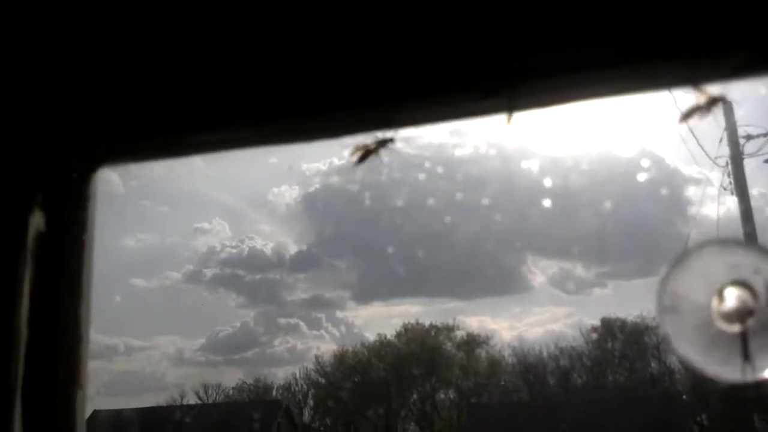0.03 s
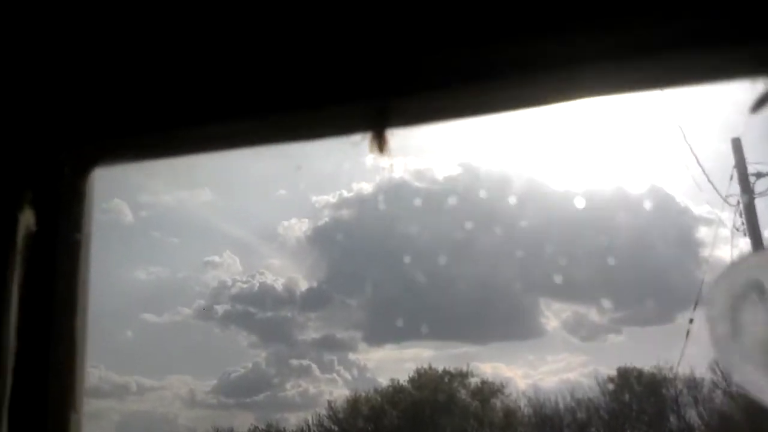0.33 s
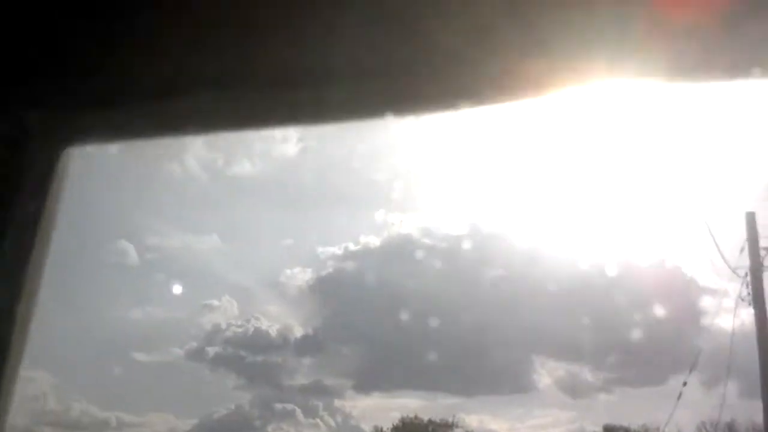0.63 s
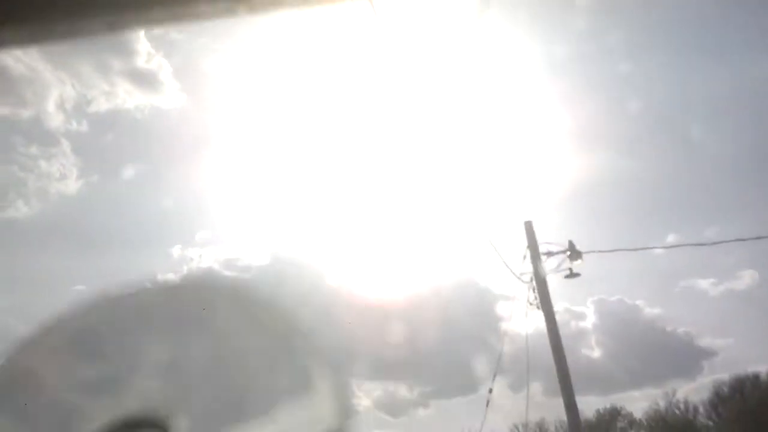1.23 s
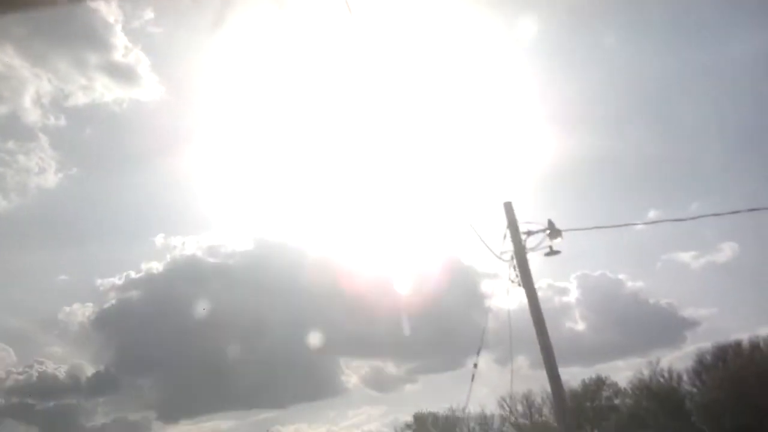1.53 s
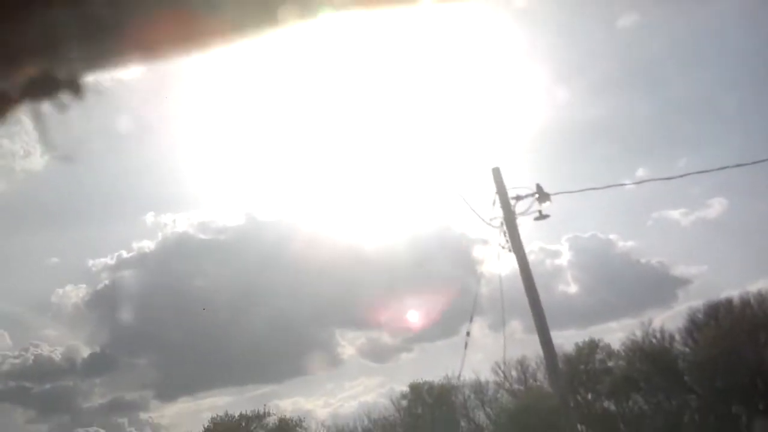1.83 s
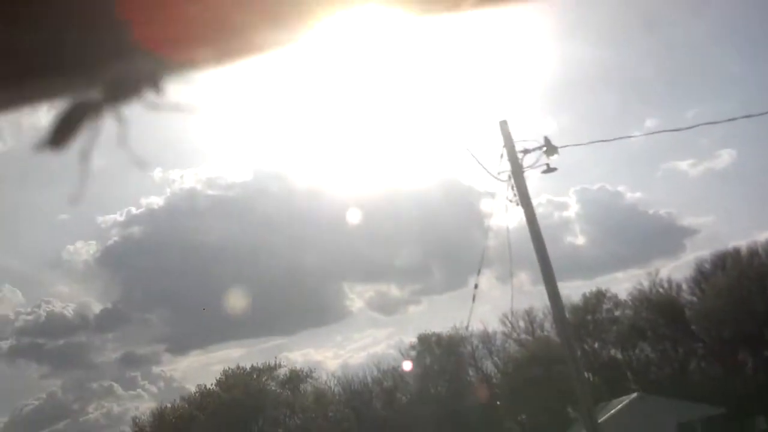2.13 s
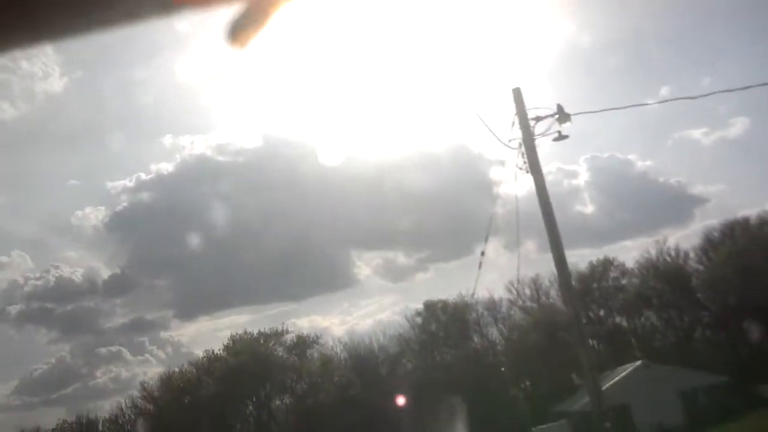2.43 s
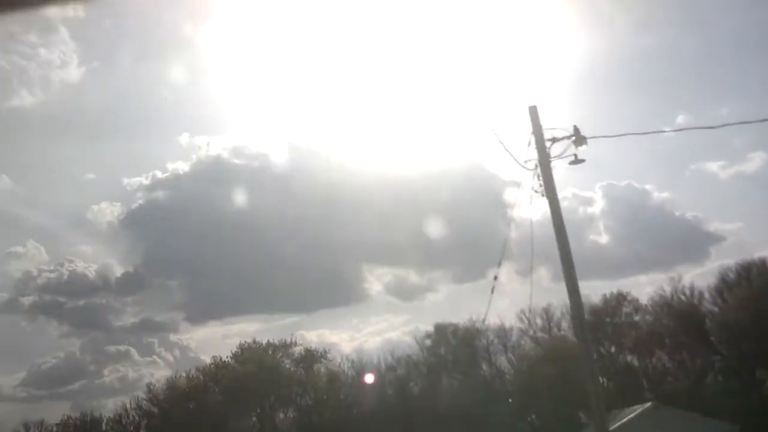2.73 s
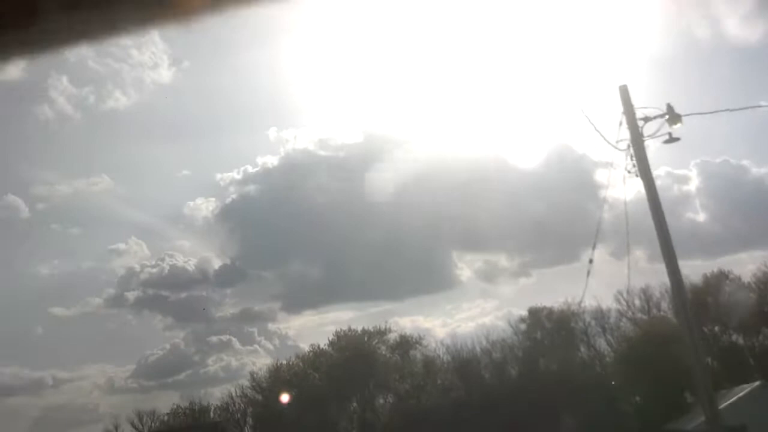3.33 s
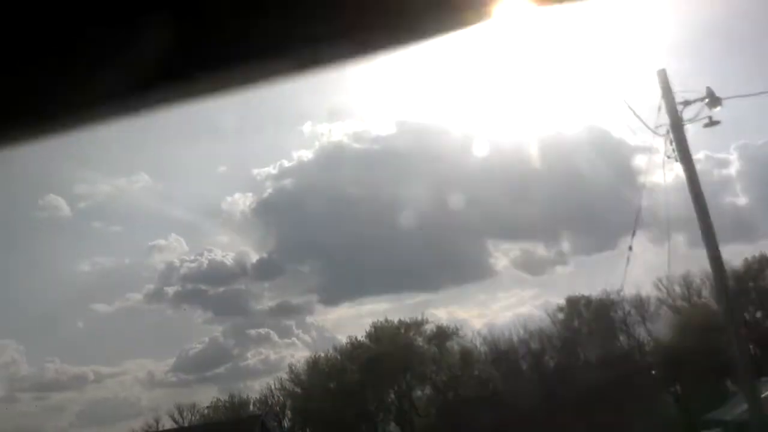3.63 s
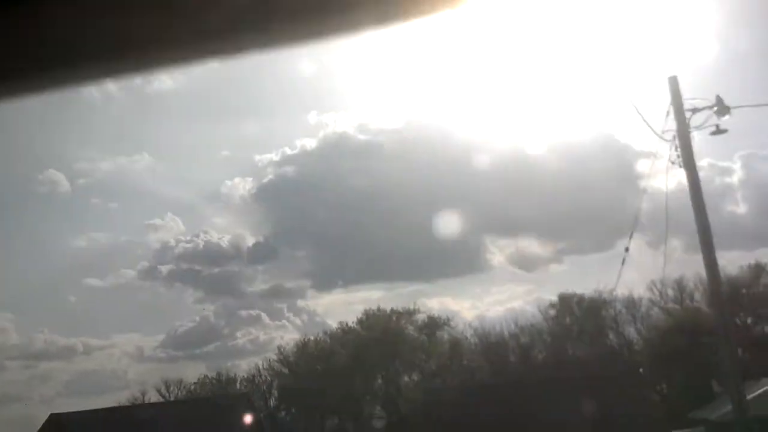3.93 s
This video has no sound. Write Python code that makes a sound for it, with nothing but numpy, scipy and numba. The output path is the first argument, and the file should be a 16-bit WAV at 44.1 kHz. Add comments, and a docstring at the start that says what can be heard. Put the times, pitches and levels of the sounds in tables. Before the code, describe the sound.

A low engine or fan hum runs throughout inside a cabin. A faint dull rush lies over it until a sharp tap strikes the microphone's case at 0.4 seconds, then a drone swells and stays. Lighter taps land at 1.4 and 2.7 seconds. The grip brushes the case now and then, hardest from 2.3 seconds with a brief soft rumble, and light rubs follow until about 3.5 seconds.

```python
"""A low engine or fan hum fills a cabin, heard from a hand-held camera beside the window.
A dull rush lies over it until a sharp tap rings the camera's case at 0.4 s; then a drone swells.
A second tap lands at 1.4 s. The grip brushes the case now and then, hardest from 2.3 s, where the
case also rumbles. A third tap comes at 2.7 s, and a few light rubs follow. Throughout, the recorder
widens the stereo; its gain control turns the sound down at each tap and lets the hum swell back."""
import sys
import numpy as np
from scipy import signal
from scipy.fft import rfft, irfft
from scipy.io import wavfile
from scipy.ndimage import uniform_filter1d
from numba import njit

SR = 44100
rng = np.random.default_rng(int(sys.argv[2]) if len(sys.argv) > 2 else 0)


def store_pcm(level_fs):
    """Save levels as 16-bit WAV."""
    pcm = np.round(np.clip(level_fs, -1, 1) * 32767).astype(np.int16)
    wavfile.write(sys.argv[1], SR, np.atleast_2d(pcm).T)


N = 176400

# How much the hum differs between the two microphones, against their sum (frequency [Hz], level [dB])
HUM_SPREAD = [(30, -2), (70, -51), (140, -2.5), (350, -8.5), (700, -6.5), (1300, 2), (2500, -1), (5000, 1),
              (15000, 0)]


def machine(t):
    """The running machine rumbles, whines and makes the cabin ring, with a drone that swells."""
    # Tone colour of the broad rumble (frequency [Hz], relative level [dB])
    rumble_colour = [(25, -46), (50, -25), (75, -11.5), (110, 4.5), (145, 5.5), (170, -1), (260, 1),
                     (340, 3), (430, -6), (520, -5), (720, -9.5), (1000, -17), (1300, -22.5), (2200, -23),
                     (3200, -22.5), (4200, -31.5), (6500, -39.5), (10000, -44.5), (16000, -38)]
    # Bands that ring all the time (frequency [Hz], width [Hz], level [dB])
    steady_bands = [(80, 6.2, -59.5), (122, 9.2, -53), (662, 53, -57.5), (761, 18, -65), (879, 29, -68.5),
                    (1290, 32, -71), (3160, 320, -83.5), (6740, 490, -70.5), (8850, 450, -70.5)]
    # Bands that drone in the cabin (frequency [Hz], width [Hz], level [dB])
    drone_bands = [(321, 55, -46), (369, 12.8, -44), (387, 75, -44), (477.7, 32, -47.5), (572, 53, -53)]
    # The machine's low tones (frequency [Hz], level [dB])
    low_tones = [(188.6, -47), (237.5, -50), (371, -51)]
    # Its thin, high whines (frequency [Hz], level [dB])
    whines = [(3263, -69.5), (8789, -76)]
    # How the sound rises and falls (time [s], hum gain [dB], drone gain [dB])
    loudness = [(0, -1, -14), (.37, -2, -22), (.45, -.5, -23), (.6, 0, -9.5), (1.3, 0.4, 0), (1.9, 0.04, 2),
                (2.3, 0.9, 2.5), (2.6, -0.5, -1), (3.0, -1.45, 0), (3.5, 0.9, 0.3), (4, 0.5, 1)]
    times, hum_db, drone_db = np.array(loudness).T
    flutter_db = 1.17 * wander(27.07)
    hum = undb(-40 + flutter_db) * noise(undb(curve(rumble_colour)), curve(HUM_SPREAD))
    hum += ringing(steady_bands)
    hum += tones(low_tones, drift=0.0044, waver_db=1)
    hum += tones(whines, drift=0.00303, waver_db=2)
    hum *= undb(np.interp(t, times, hum_db))
    drone = ringing(drone_bands) * undb(np.interp(t, times, drone_db))
    swell_db = 0.19 * wander(2.635)
    return (hum + drone) * undb(swell_db)


def ringing(bands):
    """The machine and cabin ring at certain pitches: one narrow band of noise for each."""
    spread_db = curve(HUM_SPREAD)
    return sum(undb(db) * noise(resonance(hz, width), spread_db) for hz, width, db in bands)


def tones(table, drift, waver_db):
    """Pure tones that waver in level and in pitch (drift is a fraction of the pitch)."""
    out = 0
    for hz, db in table:
        pitch = hz * (1 + drift * wander(13))
        phase = 2 * np.pi * np.cumsum(pitch) / SR
        out += np.sqrt(2) * undb(db + waver_db * wander(8.2)) * np.sin(phase)
    return out


def taps():
    """Each tap snaps, touches twice and rings the case briefly, nearer the right microphone."""
    # One faint touch, then three sharp taps
    # (time [s], level [dB], treble tilt [dB per octave], bounce delay [s], bounce strength [ratio])
    hits = [(0.3403, -30, 3, .002, 0.41), (0.3769, 2.5, -1.4, 0.00027, 0.42),
            (1.4024, -7, -1.5, 0.000868, 0.27), (2.6722, -6, -0.3, .00075, 0.35)]
    # The notes the case rings at
    # (frequency [Hz], level [dB], time to fade 60 dB [s], left swing against right [ratio])
    case_notes = [(844, -26, 0.0043, 0.93), (1390, -17.5, 0.016, 0.13), (1870, -12.5, 0.015, 0.23),
                  (3360, -8, 0.0058, 0.11), (4050, -9, 0.006, 0.38), (5590, -2.5, 0.0029, 0.077),
                  (6900, -8, 0.005, 0.68), (8690, -3, 0.0039, -0.2), (12600, -13.5, 0.0025, 0.95),
                  (13940, -11, 0.0039, -0.012)]
    snap_db, snap_fade_s, tilt_pivot_hz = -26, 0.0097, 3900
    out = np.zeros((2, N))
    age = np.arange(SR // 20) / SR
    snap = noise(resonance(hz=11100, width=6200), spread_db=0)
    for start, db, tilt_db, bounce_s, bounce_strength in hits:
        first = int(start * SR)
        span = slice(first, first + len(age))
        out[:, span] += snap[:, span] * undb(db + snap_db - 60 * age / snap_fade_s)
        for delay, strength in ((0, 1), (bounce_s, bounce_strength)):
            since = np.maximum(age - delay, 0)
            for k, (hz, note_db, fade_s, left) in enumerate(case_notes):
                ring = (-1) ** k * np.sin(2 * np.pi * hz * since) * undb(-60 * since / fade_s)
                gain = strength * undb(db + note_db + tilt_db * np.log2(hz / tilt_pivot_hz))
                out[:, span] += gain * np.outer([left, 1], ring)
    return out


def rubs(t):
    """The grip drags on the case: each grainy rub catches, hisses in its own band and lets go."""
    # Each rub (start [s], length [s], rise time [s], level [dB], treble tilt [dB per octave],
    # drop over its length [dB], hiss frequency [Hz], hiss boost [dB])
    strokes = [(-.02, 0.35, .008, -58, 6, -5, 5000, -12), (0.337, 0.074, .005, -49, 6.5, -0.5, 6500, -1),
               (0.581, 0.094, 0.041, -49, 7, 4.5, 6400, 5), (1.123, .012, .006, -57, 6, 3, 6900, 9),
               (1.645, 0.11, 0.01, -48, 6.5, 12, 6546, 0), (1.984, 0.27, 0.037, -59, 9, -1, 5100, 10),
               (2.266, 0.036, 0.019, -45.5, 5, -6.5, 5800, 0.5),
               (2.308, 0.038, 0.016, -40.5, 3.5, -1, 7500, 3),
               (2.344, 0.089, 0.012, -44.5, 7, 1.5, 6740, 0), (2.404, 0.3, 0.011, -50.5, 5.5, 3.5, 6500, 0),
               (2.516, 0.056, 0.0022, -36.5, 2.5, 22, 3920, 8), (2.68, 0.18, 0.11, -49, 7.5, 4.5, 6400, 3),
               (3.099, 0.055, 0.012, -47, 3.5, 20, 6200, 6), (3.17, 0.29, 0.11, -58, 7.5, 5.5, 6330, 12)]
    # Tone colour of all rubbing (frequency [Hz], relative level [dB])
    rub_colour = [(25, -20), (60, -4), (130, -3), (400, -18), (700, 9), (1300, 16), (1700, 9), (2200, 14),
                  (3400, 5.5), (5000, -0.5), (6700, -0.5), (9500, -11), (12000, -17), (16000, -19.5)]
    release_s = 0.014
    out = 0
    for start, length, rise, db, tilt_db, drop_db, hiss_hz, boost_db in strokes:
        age = t - start
        shape = np.clip(age / rise, 0, 1) * np.exp(-np.maximum(age - length, 0) / release_s)
        gain = undb(db - drop_db * np.clip(age / length, 0, 1))
        hiss_db = boost_db * resonance(hiss_hz, width=750)
        colour_db = curve(rub_colour) + tilt_db * np.log2(freqs()) + hiss_db
        out += shape * gain * noise(undb(colour_db), spread_db=0)
    grain_db = 2 * wander(400)
    return out * undb(grain_db)


def case_rumble(t):
    """The case rumbles as the grip shifts, then dies away."""
    start_s, rise_s, fade_s = 2.28, 0.014, 0.16
    age = np.maximum(t - start_s, 0)
    shape = np.clip(age / rise_s, 0, 1) * np.exp(-age / fade_s)
    return undb(-48.5) * shape * noise(resonance(hz=77.6, width=32), curve(HUM_SPREAD))


def rush(t):
    """A dull rush of noise that lasts until the first sharp tap."""
    end_s, release_s = 0.38, 0.014
    shape = np.clip((end_s - t) / release_s + 1, 0, 1)
    return undb(-51) * shape * noise(resonance(hz=690, width=230), curve(HUM_SPREAD))


def undb(db):
    """Turn decibels into a number to multiply by."""
    return 10 ** (np.asarray(db) / 20)


def freqs():
    """The frequencies in the whole sound's spectrum, from 1 Hz up."""
    return np.maximum(np.arange(N // 2 + 1) * SR / N, 1)


def curve(points):
    """Join (frequency, value) points with lines, giving each octave equal room."""
    hz, value = np.array(points).T
    return np.interp(np.log(freqs()), np.log(hz), value)


def resonance(hz, width):
    """A peak that passes frequencies near hz and falls steeply on both sides."""
    distance = (freqs() ** 2 - hz ** 2) / (freqs() * width * np.sqrt(2))
    return 1 / (1 + distance ** 2)


def noise(colour, spread_db):
    """Stereo noise: a common part of strength 1, and a left-right difference set by spread_db."""
    common, difference = rfft(rng.standard_normal((2, N))) * colour
    mid, side = irfft(common, N), irfft(difference * undb(spread_db), N)
    return np.array([mid + side, mid - side]) / mid.std()


def wander(rate):
    """Glide to a new random value, typically of size 1, rate times a second."""
    step = max(int(SR / rate), 1)
    held = np.repeat(rng.standard_normal(N // step + 1), step)
    smooth = uniform_filter1d(held, step)[:N]
    return smooth / smooth.std()


@njit
def gain_control(over_db, attack_s, hold_s, recover_db_per_s):
    """How many dB to turn down: jumps up with a loud peak, holds, then eases back steadily."""
    catch_up = 1 - np.exp(-1 / (attack_s * SR))
    out, cut, wait = np.zeros(len(over_db)), 0., 0.
    for i in range(len(over_db)):
        if over_db[i] > cut:
            cut += catch_up * (over_db[i] - cut)
            wait = hold_s * SR
        elif wait > 0:
            wait -= 1
        else:
            cut = max(cut - recover_db_per_s / SR, 0.)
        out[i] = cut
    return out


def widen(x):
    """Widen the stereo by subtracting a late copy of the other side, then set the balance."""
    # How much of the other side is subtracted (frequency [Hz], share [ratio])
    crossfeed = [(250, 0.043), (600, 0.48), (1100, 1), (2100, 0.47), (2450, 1), (2800, 1), (3700, 0.48),
                 (5000, 0.26), (10000, 0.12), (15000, .15)]
    # How much more sensitive the left microphone is than the right (frequency [Hz], level [dB])
    balance = [(30, -9), (70, -5), (140, -1.5), (400, 0.9), (1200, 0), (3700, 0.5), (5200, -4.5),
               (8000, 3.5), (13000, -2.5)]
    delay_s = 0.000403
    spectrum = rfft(x)
    late_share = curve(crossfeed) * np.exp(-2j * np.pi * freqs() * delay_s)
    wide = spectrum - late_share * spectrum[::-1]
    return irfft(wide * undb(np.outer([.5, -.5], curve(balance))), N)


def scene():
    """All the sounds as they reach the left and right microphones."""
    t = np.arange(N) / SR
    return machine(t) + taps() + rubs(t) + rush(t) + case_rumble(t)


def record(dry):
    """The recorder hisses, turns down peaks, widens the stereo, clips softly and cuts the top treble."""
    early_hiss_db, late_hiss_db = -59.5, -66.5
    limit_db, ceiling_db, top_hz = -13.5, -12, 15600
    x = dry + undb(early_hiss_db) * rng.standard_normal((2, N))
    over_db = 20 * np.log10(np.abs(x).max(axis=0) + 1e-9) - limit_db
    x *= undb(-gain_control(over_db, attack_s=0.00008, hold_s=0.16, recover_db_per_s=8))
    x += undb(late_hiss_db) * rng.standard_normal((2, N))
    x = widen(x)
    x = undb(ceiling_db) * np.tanh(x / undb(ceiling_db))
    return signal.sosfilt(signal.ellip(10, .2, 80, top_hz, fs=SR, output="sos"), x)


dry = scene()
out = record(dry)
store_pcm(out)
```